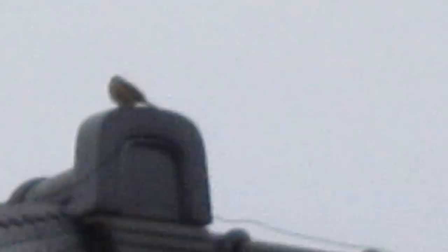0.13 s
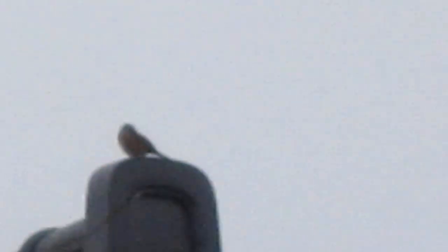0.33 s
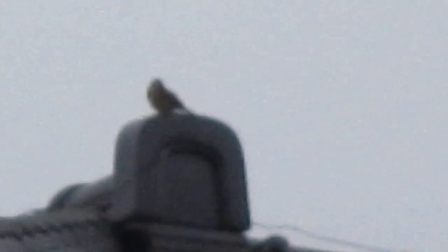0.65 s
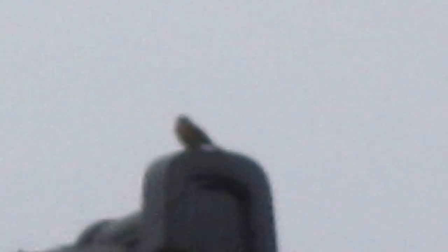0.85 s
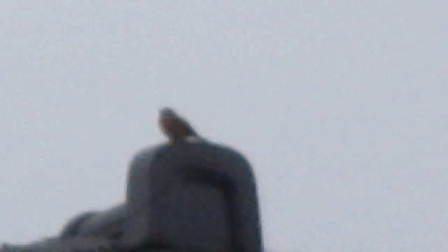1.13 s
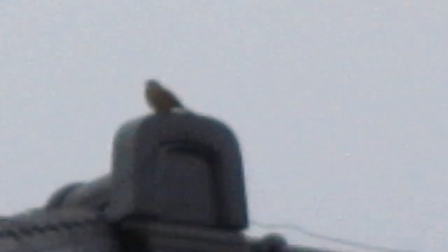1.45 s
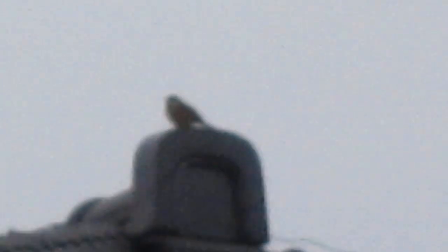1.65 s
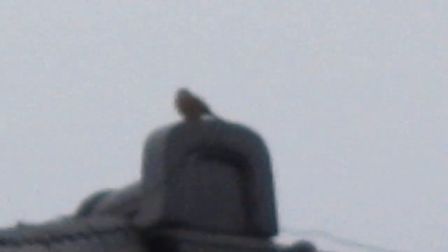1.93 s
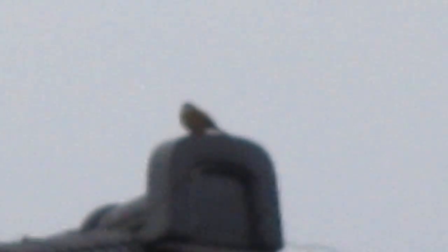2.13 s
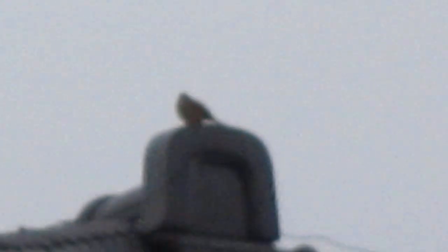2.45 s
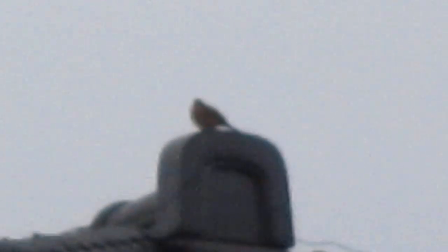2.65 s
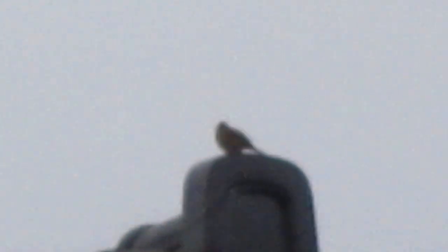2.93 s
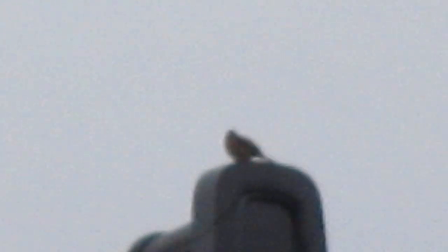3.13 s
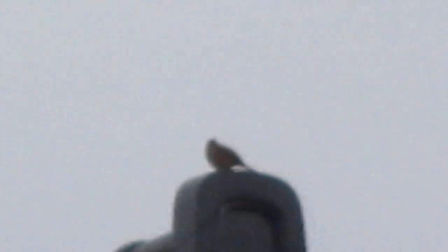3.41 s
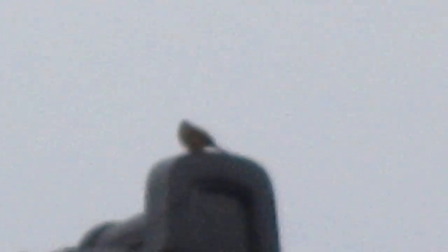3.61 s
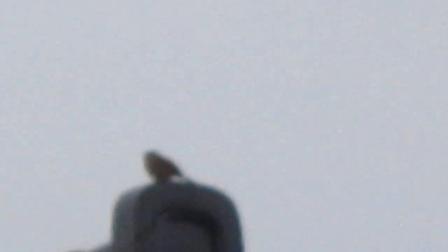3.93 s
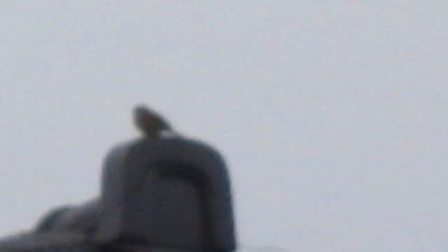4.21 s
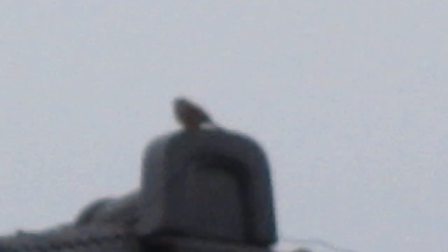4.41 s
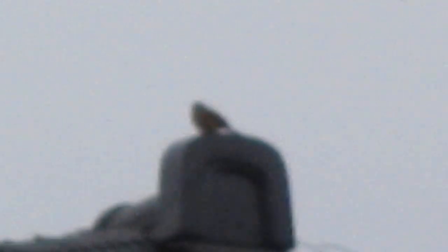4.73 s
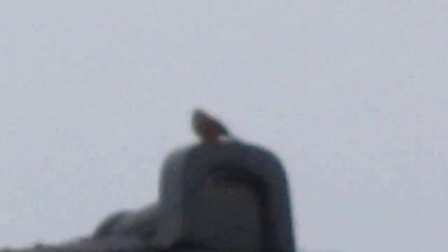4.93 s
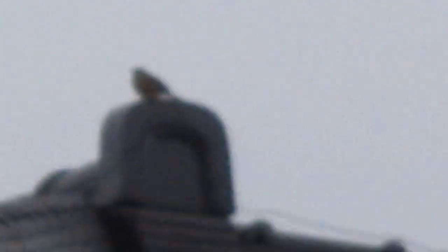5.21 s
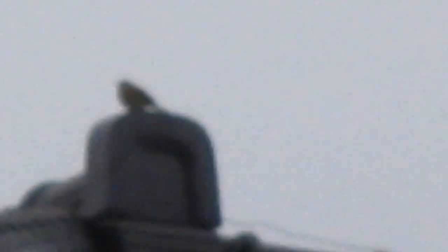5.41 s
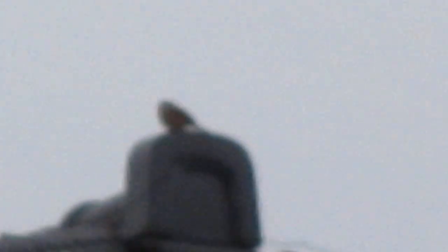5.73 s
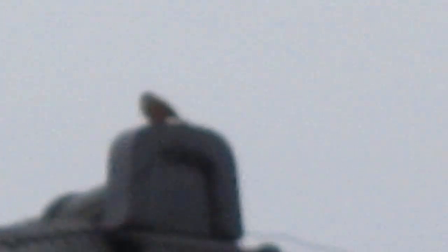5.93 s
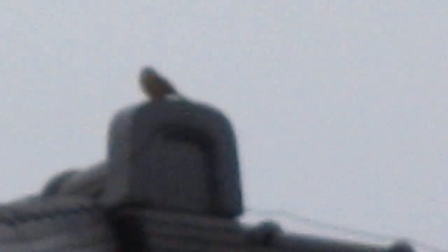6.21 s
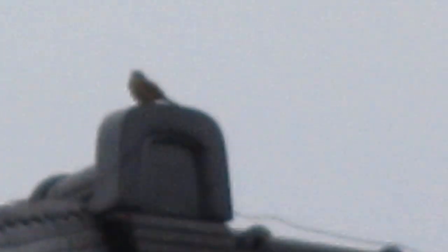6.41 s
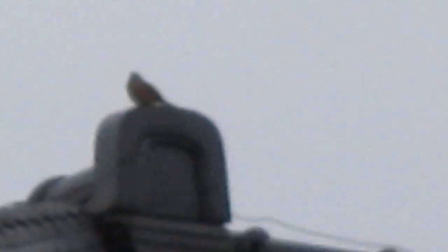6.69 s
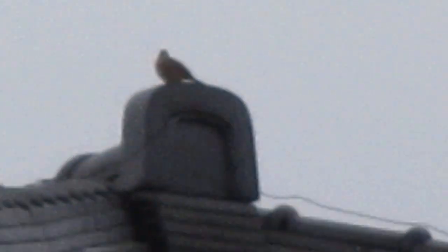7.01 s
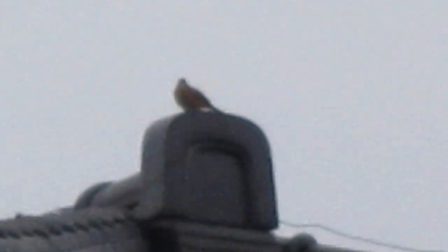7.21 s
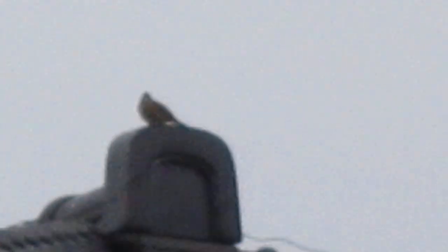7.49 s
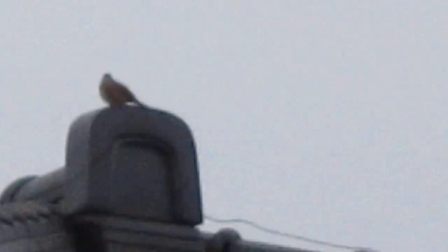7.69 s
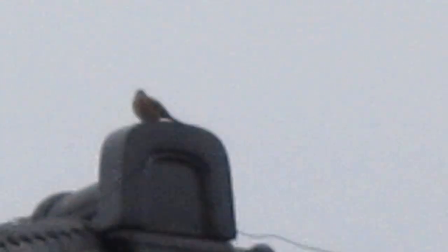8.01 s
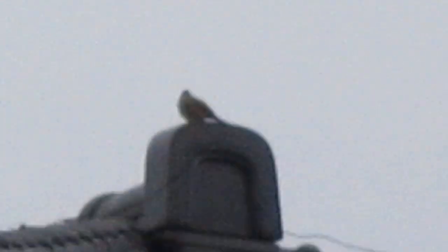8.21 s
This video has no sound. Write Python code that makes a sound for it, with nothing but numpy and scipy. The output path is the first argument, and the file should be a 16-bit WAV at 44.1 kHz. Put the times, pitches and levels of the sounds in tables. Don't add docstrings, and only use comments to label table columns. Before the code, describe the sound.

A bunting on a tiled roof sings a fast phrase at the start and again near six seconds: brief trill, dipping whistle, two leaping chirps, falling buzz. A nearby wall returns clear echoes. Between songs, faint distant birds call above steady low motor hum and soft hiss, with barely audible cricket pulses. Late on, the handheld microphone creaks and clicks, then gives one hard plastic snap.

```python
import sys
import numpy as np
from scipy import signal
from scipy.fft import rfft, irfft, next_fast_len
from scipy.io import wavfile
from scipy.ndimage import uniform_filter1d

SR = 44100
rng = np.random.default_rng(int(sys.argv[2]) if len(sys.argv) > 2 else 0)


def digitize_waveform(pressure):
    field = np.atleast_2d(pressure).T
    bounded = np.clip(field, -1, 1)
    quanta = np.round(bounded * 32767).astype(np.int16)
    wavfile.write(sys.argv[1], SR, quanta)


def gain_from_decibels(decibels):
    exponent = np.asarray(decibels, float) / 20
    return 10 ** exponent


N = 368235

# f/Hz, density/dB per Hz
AIR_SPECTRUM = [(12, -32), (22, -17), (50, -3.5), (80, -5), (130, -4), (175, -11), (300, -11), (370, -17),
                (480, -16.5), (650, -17.5), (980, -17.5), (1300, -23.5), (6400, -31), (15600, -43),
                (15800, -75)]
AIR_DB = -46.5
# multiple of shaft rate, level/dB
MOTOR_ORDERS = [(4, -65), (5, -60.5), (6, -56), (7, -65), (8, -69.5), (9, -73), (10, -71.5), (16, -67)]
# f/Hz, width/Hz, level/dB
MOTOR_DRONES = [(53, 8, -60), (103, 5, -55), (126, 5, -55), (148, 6, -57)]
SHAFT_HZ = 49.03
# f/Hz, level/dB
WHINE_TONES = [(11795, -89), (13453, -91), (15600, -95)]
# t/s, bout end/s, spacing/s, level/dB
CRICKET_BOUTS = [(.345, .71, .119, -69), (1.473, 1.59, .106, -68.5), (2.658, 3.39, .12, -68),
                 (3.497, 3.6, .085, -64), (3.66, 3.79, .12, -71), (4.017, 4.03, .12, -68),
                 (5.805, 5.82, .12, -67), (6.099, 6.43, .16, -68), (7.49, 7.91, .206, -68)]
CRICKET_HZ, CRICKET_PULSE_S = 6400, 0.03

# t/s, length/s, start f/Hz, end f/Hz, level/dB
FAR_SCOOPS = [(1.599, .049, 3030, 3530, -55.5), (1.625, .13, 3490, 3500, -54.5),
              (1.828, .042, 3050, 3650, -54), (1.846, .036, 3640, 3670, -44),
              (2.521, .035, 3010, 3300, -58), (2.54, .15, 3320, 3335, -59.5), (1.715, .04, 2400, 2300, -60),
              (3.899, .03, 3830, 2970, -51), (7.425, .024, 3500, 3050, -62), (8.17, .044, 3430, 3460, -63)]
FAR_GLIDES = [(1.362, .058, 3430, 4750, -55.5), (1.412, .08, 4650, 6800, -60),
              (1.452, .04, 4050, 4670, -61), (1.86, .09, 5500, 5510, -68), (1.688, .025, 2600, 2300, -58),
              (1.726, .04, 1920, 1880, -59), (3.791, .043, 2660, 2250, -55),
              (5.625, .014, 3900, 3000, -54.5), (5.677, .016, 5000, 2880, -51.5),
              (3.895, .014, 5000, 4300, -60), (4.055, .04, 4060, 4010, -65), (7.52, .025, 3060, 3250, -62),
              (8.325, .018, 3200, 2950, -60), (8.343, .02, 3500, 2900, -49),
              (1.942, .084, 3650, 3690, -58.5)]
FAR_DROPS = [(1.793, .024, 3530, 2900, -58), (1.912, .022, 3630, 2800, -52), (2.56, .018, 3360, 3050, -56),
             (3.84, .036, 3010, 3230, -58)]
FAR_ARCHES = [(5.568, .038, 2070, 2640, -55), (7.396, .037, 3220, 3060, -51.5)]
FAR_WARBLE = (1.226, .064, 8560, 8120, -55)
RATTLE_ONSET = (1.6, .39, 4480, 4520, -67.5)
RATTLE_BODY = (1.93, .56, 4400, 4880, -60.5)
RATTLE_LOWER = (1.98, .44, 3700, 4150, -64.5)
CHATTER_UPPER = (6.995, .145, 3100, 3400, -58)
CHATTER_LOWER = (6.99, .13, 1860, 2586, -60)
SCOOP_SHARE, GLIDE_SHARE, DROP_SHARE = .76, .51, .32

# f/Hz, level/dB, T60/s
SHELL_MODES = [(456, 6.5, 0.018), (920, 3, 0.011), (1300, 0, 0.02), (2050, 0, 0.0046), (2800, 1.9, 0.0088),
               (3650, 0.1, 0.0054), (4400, 0, 0.0062), (5800, -0.5, 0.0054), (7600, 7, 0.0048),
               (10800, 2, 0.0034), (14300, -4, .003)]
# t/s, level/dB, centre of struck modes f/Hz, reach/octaves, low push re click/dB
HAND_CLICKS = [(5.678, -37, 2600, 1.05, 1), (5.885, -41, 800, 0.66, -8), (5.971, -43, 880, .8, -10),
               (6.200, -31, 1550, 0.52, -30), (6.210, -35.5, 2400, 0.58, -20), (6.2955, -35, 1180, 0.9, 11),
               (6.304, -38, 1300, 0.78, 4), (7.3245, -34.5, 3250, 1.01, -17),
               (7.3616, -26.5, 3840, 0.67, -17), (7.3818, -32, 2900, 0.6, -8),
               (7.965, -48.5, 2900, .4, -30), (8.124, -37.5, 2000, 0.57, -30)]
CATCH_SNAP = [
    (7.3792, -24.5, 12800, .9, -40),
    (7.3793, -9.5, 4400, 0.55, -34),
    (7.3803, -17.5, 2150, 0.7, -12),
    (7.3796, -29.5, 540, 0.65, -15),
]
# t/s, length/s, start f/Hz, end f/Hz, level/dB
HAND_CREAKS = [
    (5.673, 0.0096, 1480, 3020, -38),
    (5.813, .012, 1730, 1150, -37.5),
    (5.821, .04, 1160, 1000, -39),
    (6.199, 0.011, 1650, 1900, -29.5),
    (6.297, 0.012, 2000, 1100, -37.5),
]
CLICK_RING, SNAP_RING = .8, .6
SLIPS_PER_S = 650

# t/s, trill lead/s, buzz lead/s, pitch factor, level/dB
RENDITIONS = [
    (.0, .0001, .0001, 1.0001, 0.8),
    (5.7066, .003, .012, 1.002, .9),
]
# t/s, length/s, start f/Hz, end f/Hz, level/dB
TRILL_DROP = (.417, .025, 3760, 3230, -46)
CHIP_GLIDE = (.8225, .0065, 10600, 6500, -52.5)
HIGH_GLIDE = (.830, .026, 6960, 6300, -38.5)
HOOK_ARCH = (.8825, .02, 3300, 3960, -33)
# t/s, f/Hz, level/dB
LEAP_PATH = [
    (.847, 3750, -60),
    (.851, 4250, -46),
    (.8545, 4950, -41),
    (.860, 5060, -39.5),
    (.8705, 4660, -32.5),
    (.875, 4520, -36),
    (.877, 4200, -43),
    (.8795, 3100, -44),
    (.882, 2850, -60),
]
# t/s, f/Hz, level/dB
BUZZ_PATH = [
    (1.088, 4400, -58),
    (1.096, 3980, -47),
    (1.106, 3600, -46),
    (1.138, 3290, -49.5),
    (1.156, 3030, -49.5),
    (1.164, 2840, -73),
]
# t/s, f/Hz
WHISTLE_PATHS = [
    [(.590, 3500), (.5955, 4820), (.599, 4290), (.614, 3810), (.636, 3460), (.667, 3210), (.694, 3320),
     (.742, 3900), (.753, 3980)],
    [(6.297, 3700), (6.302, 4680), (6.306, 4170), (6.324, 3800), (6.348, 3450), (6.368, 3305), (6.40, 3387),
     (6.448, 4020), (6.461, 4060)],
]
WHISTLE_SWELLS = (.5, 4.)
REPEAT_S = .1365
BUZZ_RATE_HZ, BUZZ_SWING_HZ, BUZZ_THROB = 228, 330, .45
TRILL_S, SLIDE_EVERY_S, SLIDE_S, SLIDE_FROM_HZ, SLIDE_TO_HZ = .3495, .0138, .0155, 3620, 4780
TRILL_FULL_DB, TRILL_BUILD_DB, TRILL_BUILD_SHARE = -36.5, -27, .27
FIRST_CHIP_DB, FIRST_HIGH_DB, SECOND_HOOK_DB = -5, -1.5, -2.5
WHISTLE_DB, FLICK_DB, FLICK_S, WHISTLE_ATTACK_S, WHISTLE_RELEASE_S = -34.3, -10, .007, .007, .011
DIP_HZ, DIP_WIDTH_HZ, DIP_DB = 3655, 50, -9
LOW_HZ, LOW_LOSS_DB_PER_KHZ = 3480, 20

# delay/s, smear/s, level/dB
WALL_ECHOES = [
    (.0722, .0012, -7.5),
    (.079, .006, -17),
    (.146, .004, -22),
]
ROOF_S, ROOF_DB = .001235, -12
SCATTER_DB, SCATTER_T60_S, FAR_SCATTER_DB = -6.5, 0.7, -2
ECHO_BOUNCE_S, WALL_LOW_HZ = .00066, 2600


def rms_one(x):
    return x / np.sqrt(np.mean(x ** 2) + 1e-20)


def add(out, at_s, piece):
    i = round(at_s * SR)
    out[i:i + len(piece)] += piece[:max(len(out) - i, 0)]


def sine(hz, t):
    return np.sqrt(2) * np.sin(2 * np.pi * hz * t)


def drift(rate_hz):
    r = np.exp(-80 * np.pi * rate_hz / SR)
    slow = signal.lfilter([1], [1, -2 * r, r * r], rng.standard_normal(N // 40 + 4002))[4000:]
    return np.interp(np.arange(N) / 40, np.arange(len(slow)), rms_one(slow))


def ring(x, hz, t60_s):
    r, w = gain_from_decibels(-60 / (t60_s * SR)), 2 * np.pi * hz / SR
    return signal.lfilter([0, np.sin(w)], [1, -2 * r * np.cos(w), r * r], x)


def butter(x, order, hz, kind="low"):
    return signal.sosfilt(signal.butter(order, hz, kind, fs=SR, output="sos"), x)


def air():
    size = next_fast_len(N)
    hz = np.maximum(np.arange(size // 2 + 1) * SR / size, 1)
    table_hz, table_db = np.transpose(AIR_SPECTRUM)
    colour = gain_from_decibels(np.interp(np.log(hz), np.log(table_hz), table_db))
    noise = irfft(rfft(rng.standard_normal(size)) * colour, size)[:N]
    return gain_from_decibels(AIR_DB - 2.5 + 0.32 * drift(4.5)) * rms_one(noise)


def motor():
    turns = np.cumsum(SHAFT_HZ * (1 + 0.002995 * drift(.8))) / SR
    out = np.zeros(N)
    for order, db in MOTOR_ORDERS:
        out += gain_from_decibels(db + 1.6 * drift(6.6)) * sine(1, order * turns + rng.random())
    out *= 1 + 0.26 * np.cos(np.pi * turns)
    for hz, width_hz, db in MOTOR_DRONES:
        t60_s = np.log(1000) / (np.pi * width_hz)
        out += gain_from_decibels(db) * rms_one(ring(rng.standard_normal(N), hz, t60_s))
    return out


def whine():
    t = np.arange(N) / SR
    return sum(gain_from_decibels(db + 2.5 * drift(6.5)) * sine(hz, t) for hz, db in WHINE_TONES)


def cricket():
    out, t = np.zeros(N), np.arange(0, CRICKET_PULSE_S, 1 / SR)
    pulse = np.hanning(len(t)) * sine(CRICKET_HZ, t)
    for first_s, last_s, every_s, db in CRICKET_BOUTS:
        for s in np.arange(first_s, last_s, every_s):
            add(out, s - CRICKET_PULSE_S / 2, gain_from_decibels(db) * pulse)
    return out


def note(out, rows, shift_s=0., rate_hz=0, swing_hz=0., throb=0., hoarse_hz=0.):
    s, hz, db = np.transpose(rows)
    t = np.arange(s[0], s[-1], 1 / SR)
    swing = np.cos(2 * np.pi * rate_hz * (t - s[0]))
    shake = rms_one(uniform_filter1d(rng.standard_normal(len(t)), size=50))
    pitch_hz = uniform_filter1d(np.interp(t, s, hz), size=60, mode="nearest")
    pitch_hz = pitch_hz + swing_hz * swing + hoarse_hz * shake
    level = uniform_filter1d(gain_from_decibels(np.interp(t, s, db)), size=40, mode="constant")
    level = level * (1 - throb * swing)
    add(out, s[0] + shift_s, level * sine(1, np.cumsum(pitch_hz) / SR))


def glide(row, share=None, depth=4.9, fade_db=-4., floor=.03):
    s, length_s, start_hz, end_hz, db = row
    u = np.linspace(0, 1, 13)
    if share is None:
        path_hz = [start_hz, end_hz, start_hz]
    else:
        path_hz = [start_hz, start_hz + share * (end_hz - start_hz), end_hz]
    hz = np.polyval(np.polyfit([0, .5, 1], path_hz, 2), u)
    swell_db = depth * np.log10(np.sin(np.pi * u) ** 2 + floor)
    return np.transpose([s + length_s * u, hz, db + swell_db + fade_db * u])


def far_birds():
    out = np.zeros(N)
    calls = ((FAR_SCOOPS, SCOOP_SHARE), (FAR_GLIDES, GLIDE_SHARE), (FAR_DROPS, DROP_SHARE), (FAR_ARCHES, None))
    for table, share in calls:
        for row in table:
            note(out, glide(row, share), rate_hz=37.3, throb=0.18, hoarse_hz=60.7)
    warble = glide(FAR_WARBLE, share=.55, depth=7., fade_db=1.5)
    note(out, warble, rate_hz=99, swing_hz=420, throb=0.75)
    onset = glide(RATTLE_ONSET, share=.55)
    body = glide(RATTLE_BODY, share=.68, depth=8., fade_db=-9., floor=.08)[2:]
    note(out, np.vstack([onset, body]), rate_hz=165, swing_hz=100, throb=0.75, hoarse_hz=172)
    note(out, glide(RATTLE_LOWER, share=.3), rate_hz=130, swing_hz=100, throb=0.79, hoarse_hz=380)
    note(out, glide(CHATTER_UPPER, share=.3), rate_hz=30, swing_hz=180, throb=0.38, hoarse_hz=230)
    note(out, glide(CHATTER_LOWER, share=.58), rate_hz=31.3, swing_hz=90, throb=0.46, hoarse_hz=200)
    return out


def clicks(out):
    hit = signal.unit_impulse(3000)
    blows = [(row, CLICK_RING) for row in HAND_CLICKS] + [(row, SNAP_RING) for row in CATCH_SNAP]
    for (s, db, centre_hz, reach_oct, push_db), damping in blows:
        click = gain_from_decibels(push_db) * ring(hit, 180, 0.017)
        for k, (hz, mode_db, t60_s) in enumerate(SHELL_MODES):
            share_db = mode_db - 6 * (np.log2(hz / centre_hz) / reach_oct) ** 2 + 1.45 * rng.normal()
            click += (-1) ** k * gain_from_decibels(share_db) * ring(hit, hz, t60_s * damping)
        add(out, s, gain_from_decibels(db) * click)


def creaks(out):
    hit = signal.unit_impulse(3000)
    for s, length_s, start_hz, end_hz, db in HAND_CREAKS:
        gaps, sizes = rng.random((2, 40))
        lags_s = (np.cumsum(.4 + 1.5 * gaps) - 1) / SLIPS_PER_S
        for lag_s, size in zip(lags_s[lags_s < length_s], sizes):
            hz = start_hz + (end_hz - start_hz) * lag_s / length_s
            slip = ring(hit, hz * (0.81 + 0.36 * size), 0.01)
            add(out, s + max(lag_s, 0), gain_from_decibels(db - 8.1 * size) * slip)


def housing():
    out = np.zeros(N)
    clicks(out)
    creaks(out)
    return out


def whistle(path, swell_db):
    s, hz = np.transpose(path)
    t = np.arange(s[0], s[-1], .001)
    hz = uniform_filter1d(np.interp(t, s, hz), size=3, mode="nearest")
    bends_s = s[0] + np.cumsum([0, .003, FLICK_S, WHISTLE_ATTACK_S])
    db = np.interp(t, bends_s, [-28, FLICK_DB, FLICK_DB, 0])
    db -= 30 * np.clip(1 - (s[-1] - t) / WHISTLE_RELEASE_S, 0, 1) ** 2
    db += DIP_DB * np.exp(-.5 * ((hz - DIP_HZ) / DIP_WIDTH_HZ) ** 2) * (t > bends_s[2])
    db += swell_db * ((t - s[0]) / (s[-1] - s[0]) - .7)
    db -= LOW_LOSS_DB_PER_KHZ * np.maximum(LOW_HZ - hz, 0) / 1e3
    return np.transpose([t, hz, WHISTLE_DB + db])


def hook(stretch):
    start_s, length_s = HOOK_ARCH[:2]
    s, hz, db = glide(HOOK_ARCH, depth=10., fade_db=-3., floor=.01).T
    u = (s - start_s) / length_s
    return np.column_stack([start_s + stretch * length_s * u ** 1.9, hz + 80 * u, db])


def trill():
    slides = []
    for k in range(5):
        db = TRILL_FULL_DB + TRILL_BUILD_DB * TRILL_BUILD_SHARE ** k
        row = (TRILL_S + k * SLIDE_EVERY_S, SLIDE_S, SLIDE_FROM_HZ, SLIDE_TO_HZ, db)
        slides.append(glide(row, share=.55, depth=8.5, fade_db=-1.5, floor=.008))
    return slides + [glide(TRILL_DROP, share=.12, depth=5.5, fade_db=4., floor=.01)]


def leaping_syllables():
    chip = glide(CHIP_GLIDE, share=.55, depth=5.5, fade_db=-1.5, floor=.015)
    high = glide(HIGH_GLIDE, share=.55, depth=8., fade_db=-2.5, floor=.01)
    parts = []
    for again in (0, 1):
        syllable = ((chip, FIRST_CHIP_DB * (1 - again)), (high, FIRST_HIGH_DB * (1 - again)),
                    (LEAP_PATH, 0), (hook(1 + .2 * again), SECOND_HOOK_DB * again))
        parts += [np.add(rows, (again * REPEAT_S, 0, db)) for rows, db in syllable]
    return parts


def bunting():
    out = np.zeros(N)
    trill_notes, leap_notes = trill(), leaping_syllables()
    for start_s, trill_lead_s, buzz_lead_s, pitch, db in RENDITIONS:
        for notes, shift_s in ((trill_notes, start_s - trill_lead_s), (leap_notes, start_s)):
            for rows in notes:
                note(out, np.multiply(rows, (1, pitch, 1)) + (0, 0, db), shift_s, hoarse_hz=25)
        buzz = np.multiply(BUZZ_PATH, (1, pitch, 1)) + (0, 0, db)
        note(out, buzz, start_s - buzz_lead_s, BUZZ_RATE_HZ, BUZZ_SWING_HZ, BUZZ_THROB, hoarse_hz=89)
    for path, swell_db in zip(WHISTLE_PATHS, WHISTLE_SWELLS):
        note(out, whistle(path, swell_db), hoarse_hz=6.1)
    return out


def outdoors(x, noise, scatter_db, echo_db, roof_db):
    t = np.arange(SR // 2) / SR
    tail = noise[0] * gain_from_decibels(-60 * t / SCATTER_T60_S) * (t > .003)
    reply = butter(gain_from_decibels(scatter_db) * tail / np.linalg.norm(tail), 2, 3800, "high")
    walls = np.zeros(len(t))
    for grain, (delay_s, smear_s, db) in zip(noise[1:], WALL_ECHOES):
        arrivals = np.sinc((t - delay_s) * SR) + .45 * np.sinc((t - delay_s - ECHO_BOUNCE_S) * SR)
        patch = (grain + 12 * arrivals) * np.exp(-.5 * ((t - delay_s) / smear_s) ** 2)
        walls += gain_from_decibels(db + echo_db) * patch / np.linalg.norm(patch)
    reply += butter(walls, 2, WALL_LOW_HZ, "high")
    reply = butter(reply, 6, 7700)
    reply[0] = 1
    reply += gain_from_decibels(roof_db) * np.sinc((t - ROOF_S) * SR)
    return signal.oaconvolve(x, reply)[:N]


def scene():
    surfaces = rng.standard_normal((2, len(WALL_ECHOES) + 1, SR // 2))
    bed = air() + motor() + whine() + cricket() + housing()
    far = outdoors(far_birds(), surfaces[1], FAR_SCATTER_DB, echo_db=-15, roof_db=-16.5)
    near = outdoors(bunting(), surfaces[0], SCATTER_DB, echo_db=1.5, roof_db=ROOF_DB)
    return (bed + far + near)[None]


def band_limit(x):
    return signal.sosfilt(signal.butter(12, 16510, fs=SR, output="sos"), x)


def record(dry):
    mix = signal.sosfilt(signal.cheby2(8, 50, 17300, fs=SR, output="sos"), dry)
    return band_limit(mix)


dry = scene()
out = record(dry)
digitize_waveform(out)
```